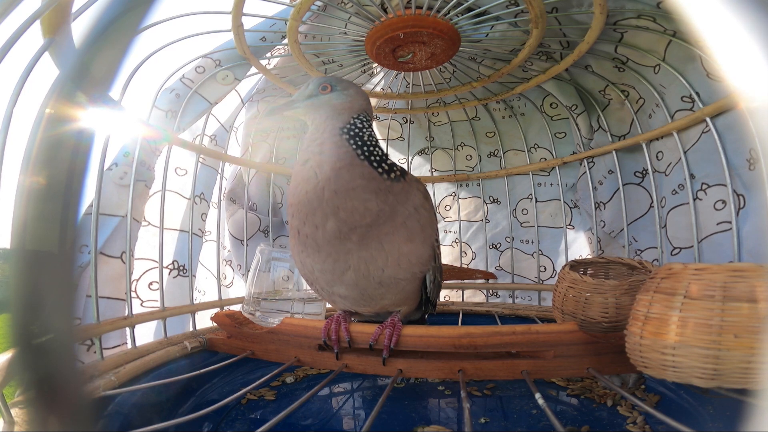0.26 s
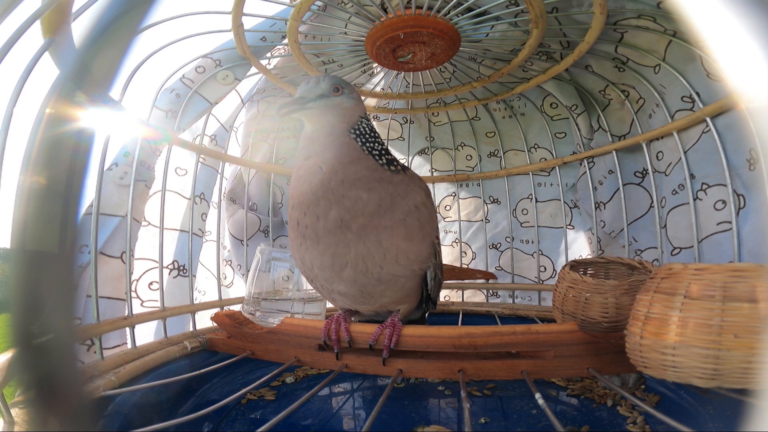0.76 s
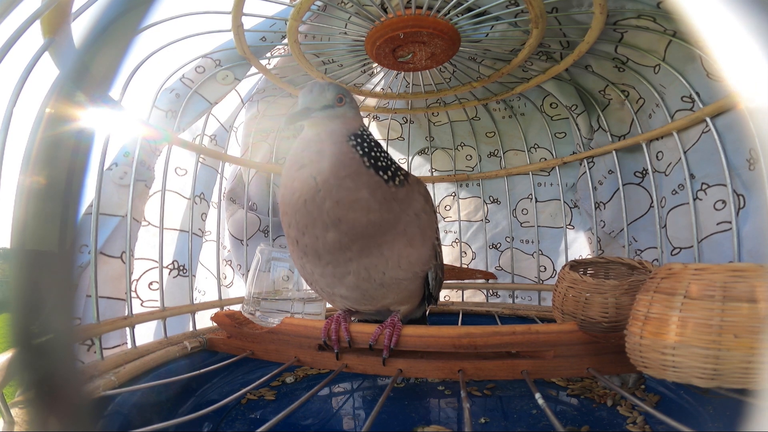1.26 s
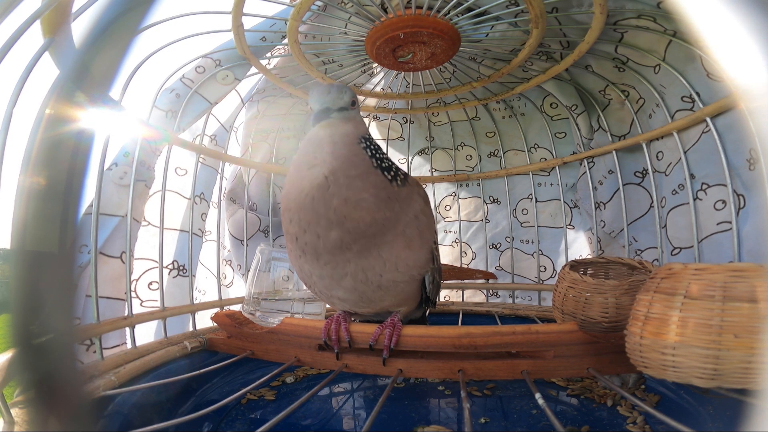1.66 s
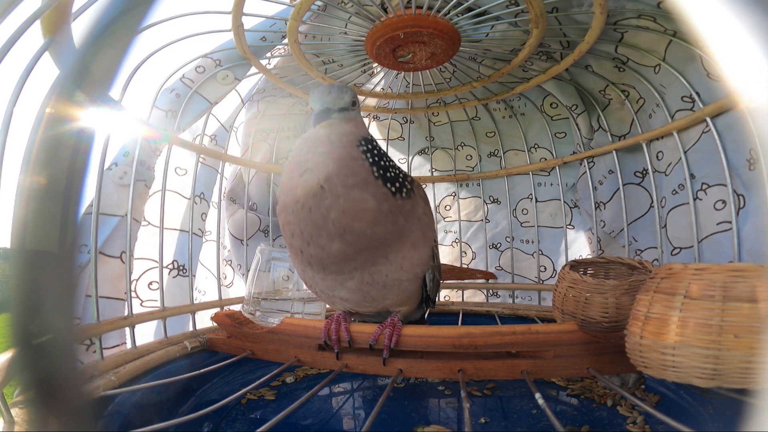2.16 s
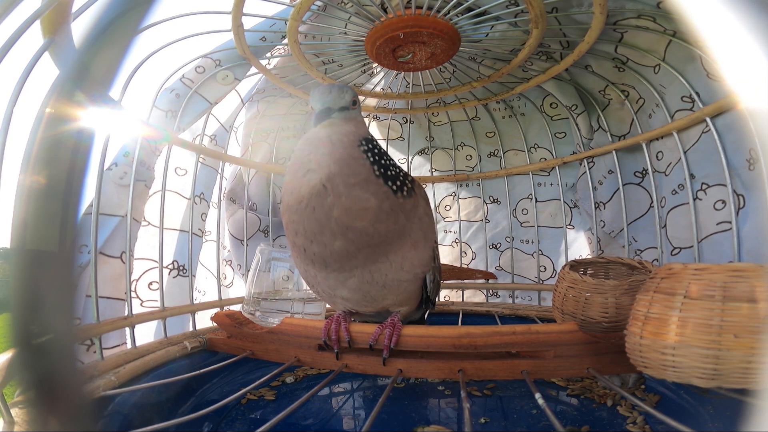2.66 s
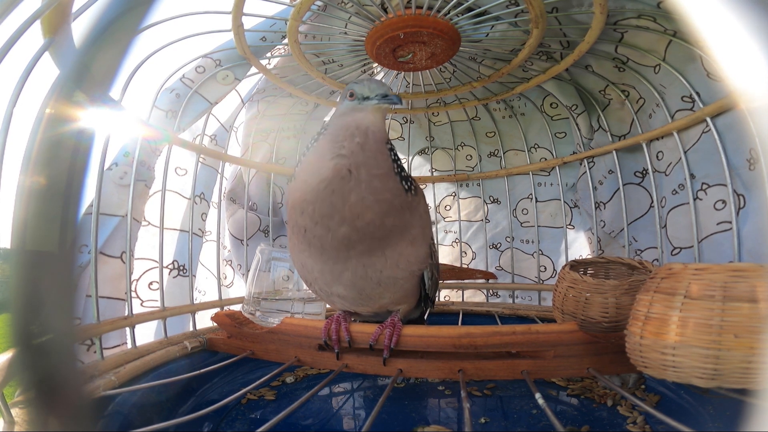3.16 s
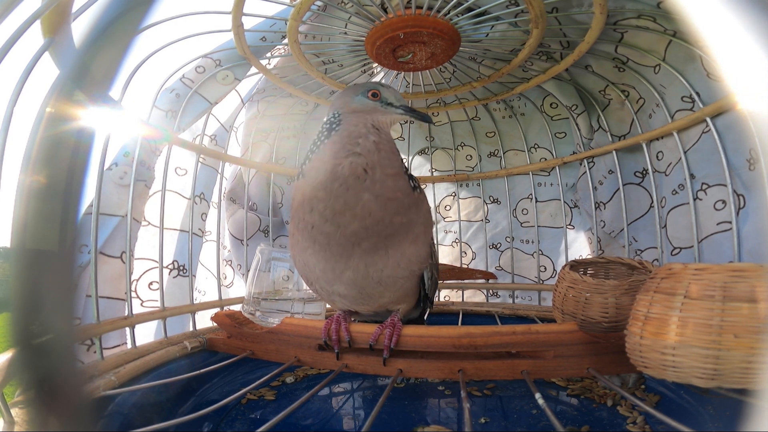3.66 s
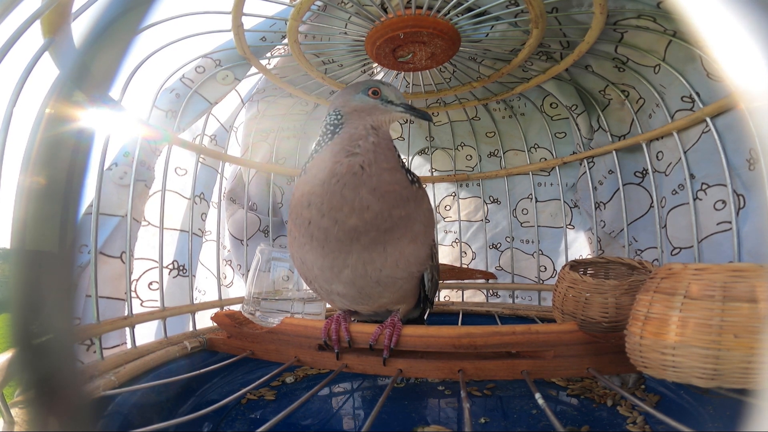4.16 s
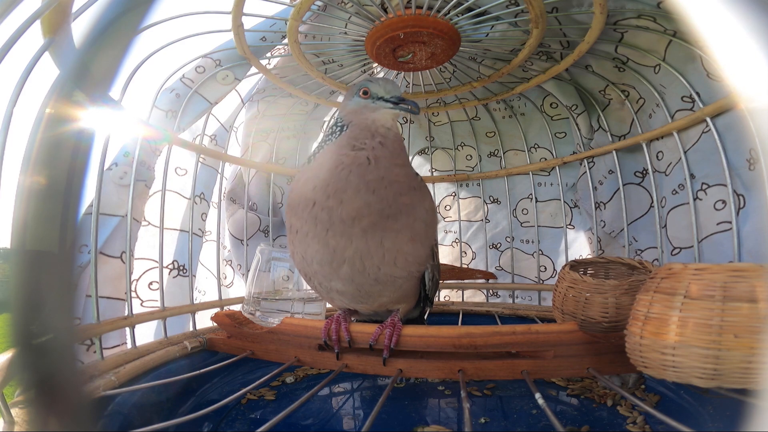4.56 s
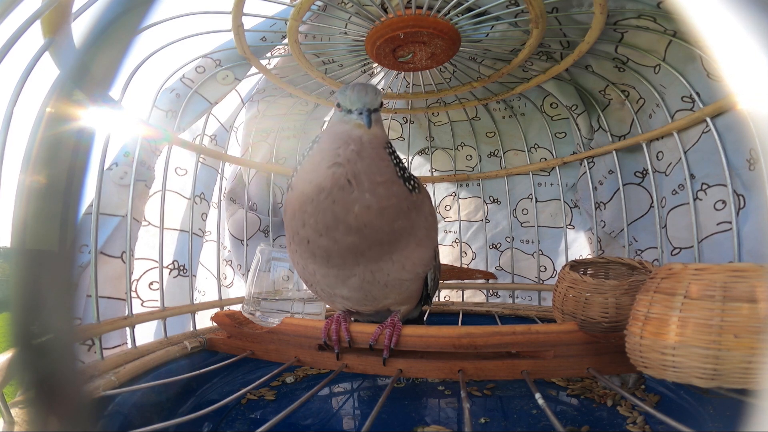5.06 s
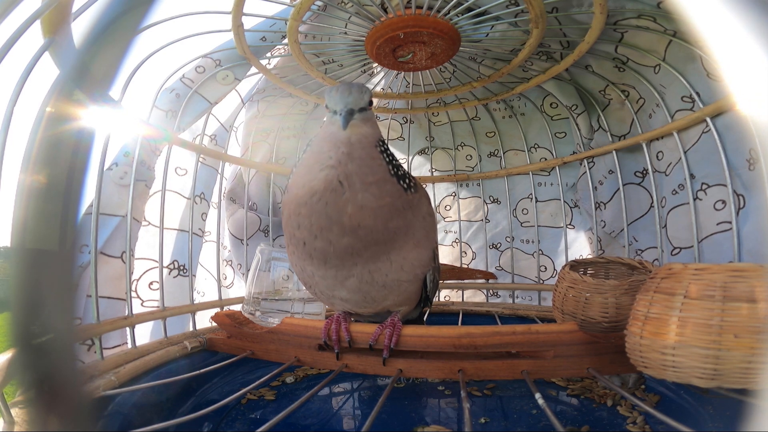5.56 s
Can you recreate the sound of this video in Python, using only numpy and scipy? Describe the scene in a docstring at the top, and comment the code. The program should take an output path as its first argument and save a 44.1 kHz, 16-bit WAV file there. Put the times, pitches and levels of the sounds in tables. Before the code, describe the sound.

A caged dove close by gives two throaty rolling coo phrases, with small birds whistling behind and low traffic rumble and soft hiss.

```python
"""Caged dove, two phrases

A spotted dove sings close by in a covered cage: cluck, arched coo, rolled coo that sinks away and, in the
first phrase, a soft closing coo. Air pressure drives pitch and level of its near-pure tone; loud peaks clip.
Other birds (gliding sines) whistle and chirp farther off, cage ticks and rustles are noise through high modes,
and far traffic and hiss are shaped stereo noise."""
import sys
import numpy as np
from scipy import signal
from scipy.io import wavfile

SR = 44100
rng = np.random.default_rng(int(sys.argv[2]) if len(sys.argv) > 2 else 0)


def persist_wave(psi):
    """Save psi, clipped to +-1, as 16-bit WAV."""
    counts = np.round(np.clip(psi, -1, 1) * 32767).astype(np.int16)
    wavfile.write(sys.argv[1], SR, np.atleast_2d(counts).T)


N = 256662
TIME = np.arange(N) / SR


def from_db(db):
    """Decibels to gain."""
    return 10 ** (np.asarray(db) / 20)


def rms_one(x):
    """Scale to unit RMS."""
    return x / np.sqrt(np.mean(x ** 2) + 1e-20)


def in_time(rows):
    """Each column of a time table, interpolated to every sample."""
    s, *columns = np.transpose(rows)
    return [np.interp(TIME, s, c) for c in columns]


def at_hz(points, hz):
    """Read a spectrum on a log-frequency axis."""
    table_hz, values = np.transpose(points)
    return np.interp(np.log(hz), np.log(table_hz), values)


def band(x, low_hz, high_hz):
    """Butterworth band-pass."""
    edges_hz = [low_hz, min(high_hz, .45 * SR)]
    return signal.sosfilt(signal.butter(2, edges_hz, "band", fs=SR, output="sos"), x + 1e-18)


def resonance(x, hz, width_hz):
    """Two-pole resonance, unit gain at the peak."""
    r = np.exp(-np.pi * width_hz / SR)
    numerator = np.array([1, 0, -1]) * (1 - r * r) / 2
    denominator = [1, -2 * r * np.cos(2 * np.pi * hz / SR), r * r]
    return signal.lfilter(numerator, denominator, x + 1e-18)


def drift(rate_hz):
    """Random wander of unit RMS, with rate_hz new values per second."""
    return rms_one(np.interp(TIME * rate_hz, np.arange(8192), rng.standard_normal(8192)))


def delayed(x, seconds):
    """The same sound arriving later."""
    return np.interp(TIME - seconds, TIME, x, left=0)


def phase_of(hz):
    """Running phase of a gliding pitch."""
    return 2 * np.pi * np.cumsum(hz) / SR


def swell(start, length):
    """Half-sine rise and fall."""
    return np.sin(np.pi * np.clip((TIME - start) / length, 0, 1))


def sounding(start, length, edge_s):
    """Gate with tanh edges."""
    opening = np.tanh((TIME - start) / edge_s / 2)
    closing = np.tanh((TIME - start - length) / edge_s / 2)
    return (opening - closing) / 2


def glide(start, length, from_hz, to_hz, db, waver):
    """Short bird note: a sine sliding between two pitches under a half-sine swell."""
    pitch = np.interp(TIME, [start, start + length], [from_hz, to_hz])
    return from_db(db) * swell(start, length) * np.sin(phase_of(pitch * (1 + waver)))


def reverb(x, t60):
    """Dense decaying reflections, independent per side, unit energy."""
    t = TIME[:SR]
    tail = rng.standard_normal((2, SR)) * from_db(-60 * t / t60) * (1 - np.exp(-t / 0.0034))
    tail /= np.sqrt(np.sum(tail ** 2, axis=1, keepdims=True))
    return signal.fftconvolve(x[None], tail, axes=1)[:, :N]


# left-right correlation of the outdoor noise: [f/Hz, correlation/1]
LIKENESS = [(50, 1), (150, 0.93), (400, 0.27), (1000, 0.49), (2500, .1), (10000, 0.088)]


def banded_noise(spectrum, patchy_db):
    """Half-octave bands of stereo noise, each with its own level, flicker and left-right correlation."""
    out, edges_hz = 0, 20 * 2 ** (np.arange(21) / 2)
    white = rng.standard_normal((2, 2, N))
    for k, (low, high) in enumerate(zip(edges_hz, edges_hz[1:])):
        mid, side = band(white[k % 2], low, high)
        hz = np.sqrt(low * high)
        alike = np.clip(at_hz(LIKENESS, hz), -1, 1)
        gain = from_db(at_hz(spectrum, hz) + patchy_db * drift(14))
        stereo = np.sqrt(1 + alike) * mid + np.sqrt(1 - alike) * side * [[1], [-1]]
        out = out + gain * stereo
    return rms_one(out)


# background level before channel trim; swells, steps down abruptly near 3.93 s, then rises again:
# [t/s, rumble level/dB, hiss level/dB]
BACKGROUND = [(0, -39, -51), (0.6, -36, -48), (1.3, -34.5, -46), (3.05, -31.5, -44.5), (3.925, -33, -44.5),
              (3.95, -41, -52), (4.35, -37.5, -48.5), (5.3, -36.5, -48.3), (5.82, -34.5, -41.5)]
# traffic spectrum: [f/Hz, relative density/dB per Hz]
RUMBLE = [(12, -41), (20, -16), (48, -2.5), (85, 0.5), (129, -5), (195, -5), (282, -13), (344, -15),
          (375, -15), (409, -19.5), (600, -24.5), (780, -59), (1320, -120)]
# hiss spectrum: [f/Hz, relative density/dB per Hz]
HISS = [(300, 3.5), (450, -1), (700, -2), (1000, -5), (1500, -9.5), (2300, -13.5), (3300, -20.5),
        (5500, -23.5), (8000, -36), (10000, -26), (12000, -39), (16000, -51.5)]


def outdoors(left_lag_s=.0005):
    """Far traffic and soft hiss as band noise, reaching the right port first."""
    rumble_db, hiss_db = in_time(BACKGROUND)
    rumble = from_db(rumble_db) * rms_one(band(banded_noise(RUMBLE, patchy_db=2.0), 26, 1200))
    hiss = from_db(hiss_db) * rms_one(band(banded_noise(HISS, patchy_db=1.0), 370, 18000))
    left, right = rumble + hiss
    return np.array([delayed(left, left_lag_s), right]) * from_db([[-.5], [.5]])


# slurs of a distant bird: [t/s, level/dB before mix]
SLURS = [(0.01, -52), (1.535, -51.5), (5.031, -50.5)]


def slurs(length_s=0.066, start_hz=1625, end_hz=2077, quaver=0.036):
    """Rising slurs: upward sine glides with slight pitch jitter."""
    wobble = quaver * drift(500)
    return sum(glide(start, length_s, start_hz, end_hz, db, wobble) for start, db in SLURS)


def twitter(count=6, db=-64, length_s=0.12, quaver=0.032, low_hz=2000, high_hz=3300):
    """Faint quavering notes at random times and log-random pitches."""
    wobble = quaver * drift(500)
    when, height = rng.random((count, 2)).T
    pitches_hz = low_hz * (high_hz / low_hz) ** height
    return sum(glide(start, length_s, hz, hz, db, wobble) for start, hz in zip(when * N / SR, pitches_hz))


# cage ticks: [t/s, level/dB before trim, length/s]
TICKS = [(0.291, -44, 0.013), (0.357, -42, 0.0094), (0.478, -43, 0.0082), (1.1646, -42, 0.0091),
         (1.3138, -32, 0.0091), (2.476, -48, 0.01), (2.708, -44, 0.01), (4.155, -48, 0.01),
         (4.5837, -39.5, 0.0102), (4.6766, -38.5, 0.013), (5.3179, -44.5, 0.01), (5.377, -42, 0.0095)]
# longer rustles: [t/s, length/s, level/dB of the drive]
RUSTLES = [(0.152, 0.11, -48), (1.082, 0.075, -48), (4.561, 0.033, -50.5), (5.213, 0.047, -46)]
# modes rung by ticks and rustles: [f/Hz, width/Hz, level/dB]
TICK_MODES = [(4270, 1100, 0.5), (6300, 790, 1.5), (9200, 990, -3), (12300, 2600, -15.5)]


def ticks_and_rustles(grain_db=4, tick_db=-1.0, lead_s=0.0017):
    """Grainy friction noise, in short and longer swells, rings a few high modes."""
    friction = rms_one(rng.standard_normal(N) * from_db(grain_db * drift(830)))
    tick_force = sum(from_db(db + tick_db) * swell(start - lead_s, length) for start, db, length in TICKS)
    rustle_force = sum(from_db(db) * swell(start, length) for start, length, db in RUSTLES)
    drive = (tick_force + rustle_force) * friction
    # alternate mode signs
    return sum((-1) ** k * from_db(db) * resonance(drive, hz, width)
               for k, (hz, width, db) in enumerate(TICK_MODES))


# two-stroke tweets: [t/s, level/dB before stroke level and mix]
TWEETS = [(0.187, -39.5), (5.207, -40)]
# strokes of a tweet: [delay/s, length/s, start f/Hz, end f/Hz, relative level/dB]
STROKES = [(0, 0.025, 3300, 3950, -8.5), (0.025, 0.039, 3080, 3575, 0)]


def tweets(warble=0.012):
    """Quick tweets: two rising sine strokes each, with pitch jitter."""
    wobble = warble * drift(500)
    return sum(glide(start + delay, length, from_hz, to_hz, db + stroke_db, wobble)
               for start, db in TWEETS for delay, length, from_hz, to_hz, stroke_db in STROKES)


# distant cheeps: [t/s, length/s, f/Hz, level/dB before mix, quaver/share of f]
CHEEPS = [(0.429, 0.024, 2740, -55.5, 0.052), (0.533, 0.073, 2606, -55.5, 0.036),
          (0.709, 0.028, 2610, -49, 0.09), (1.586, 0.04, 2290, -55, 0.069), (2.623, 0.11, 5480, -61, 0.04),
          (2.704, 0.024, 2570, -43, 0.05), (2.739, 0.02, 2587, -43.5, 0.04),
          (3.165, 0.034, 2430, -47.5, 0.06), (3.504, 0.1, 3500, -55.5, 0.0053),
          (3.545, 0.037, 2490, -45.5, 0.097), (3.58, 0.02, 2690, -44.5, 0.1),
          (3.616, 0.23, 5440, -65.5, 0.044), (3.721, 0.03, 2250, -53, 0.0046),
          (3.88, 0.05, 2955, -56.5, 0.006)]


def cheeps():
    """Distant cheeps: level-pitched sines that quaver at random."""
    wobble = drift(500)
    return sum(glide(start, length, hz, hz, db, quaver * wobble) for start, length, hz, db, quaver in CHEEPS)


def dove(jitter=0.0049, shimmer_db=0.25, octave_db=-31, upper_db=-52, husk_db=-3, throat_hz=670, flutter=0.13,
         ring_db=-17, ring_hz=660, ring_width_hz=60):
    """Beak shut, the swollen throat lets out an almost pure tone, a faint octave and husky edges."""
    pitch, strength, husk = airflow()
    phase = phase_of(pitch * (1 + jitter * drift(150)))
    tone = strength * from_db(shimmer_db * drift(120)) * np.sin(phase)
    # octave: nearly as strong in soft notes as in loud; passes best at low pitch
    octave = np.tanh(strength / 0.12) * np.sin(2 * phase)
    octave = from_db(octave_db) * band(band(octave, 540, 960), 540, 960)
    # fourth and fifth harmonics: emerge near full pressure
    upper = from_db(upper_db) * strength ** 2 * sum(np.sin(k * phase) for k in (4, 5))
    # unsteady flutter around the throat resonance, before the tone locks in and after it breaks off
    unsteady = np.sin(phase_of(throat_hz * (1 + flutter * drift(450))))
    rasp = from_db(husk_db) * band(husk * unsteady, 470, 880)
    voice = tone + octave + upper + rasp
    # sudden starts and stops leave the cage ringing
    cage_ring = from_db(ring_db) * resonance(delayed(voice, .006), ring_hz, ring_width_hz)
    return voice, cage_ring


def airflow():
    """Strength-weighted pitch, total strength and total huskiness over all dove notes."""
    parts = short_beats() + arched_coos() + rolled_coos() + [closing_coo()]
    strength = sum(level for _, level, _ in parts)
    pitch = sum(hz * level for hz, level, _ in parts) / (strength + 1e-9)
    return pitch, strength, sum(husk for _, _, husk in parts)


def loudness(hz, full_db=2.5, full_hz=553.7, knee_hz=15.85, db_per_hz=0.1567):
    """Pressure raises pitch and level together, until level saturates at full pressure."""
    shortfall_hz = knee_hz * np.logaddexp(0, (full_hz - hz) / knee_hz)
    return from_db(full_db - db_per_hz * shortfall_hz)


def melody(shape, start, stretch):
    """Note pitch at every sample, and note end time."""
    s, hz = np.transpose(shape)
    return np.interp(TIME, start + stretch * s, hz), start + stretch * s[-1]


def beat(start, length, hz, db, edge_s=0.0013, sag=.065, puff=0.13, puff_s=0.012, lead=.12, lead_s=0.0038):
    """One short opening (pitch, strength, husk): pitch arches, air leaks before and flutters after."""
    place = np.clip(2 * (TIME - start) / length - 1, -1.5, 1.5)
    after = TIME - start - length
    peak = from_db(db) * loudness(hz)
    leak = lead * swell(start - 2 * lead_s, 2 * lead_s)
    release = puff * (after > 0) * np.exp(-np.abs(after) / puff_s)
    arched_hz = hz * (1 + sag * (1 / 4 - place ** 2))
    return arched_hz, peak * sounding(start, length, edge_s), peak * (leak + release)


# short single beats, two clucks and a brief stumble early in the first rolled coo:
# [t/s, length/s, nominal f/Hz, accent level/dB]
SHORT_BEATS = [(1.018, 0.0225, 509.2, -0.7), (1.7724, 0.0049, 560, -2.5), (4.7712, 0.0245, 506, 1.0)]


def short_beats():
    """Two clucks and a brief stumble early in the first roll: throat openings with a stronger, longer release."""
    return [beat(*row, puff=0.24, puff_s=0.021) for row in SHORT_BEATS]


# arched-coo melody: [t/s into note before stretch, f/Hz]
ARCH = [(0, 420), (0.009, 491.8), (0.023, 539.2), (0.05, 556), (0.087, 612.6), (0.143, 605.2), (0.172, 543),
        (0.216, 508), (0.236, 385)]
# arched coos: [t/s, length/s, time stretch/1, accent level/dB, break delay/s, break step/dB,
# husk t/s, husk length/s]
ARCHED_COOS = [(1.334, 0.229, 0.985, -0.39, 0.1, -2.7, 1.308, 0.05),
               (5.076, 0.224, 1.01, -0.23, 0.093, -2, 5.066, 0.032)]


def arched_coos(edge_s=0.0016, husk_db=-18):
    """Husky start, then a clear pitch arch whose level drops a step where the voice breaks near the top."""
    parts = []
    for start, length, stretch, db, break_s, break_db, husk_start, husk_s in ARCHED_COOS:
        pitch, _ = melody(ARCH, start, stretch)
        broken = sounding(start + break_s, length, edge_s / 2)
        level = from_db(db + break_db * broken)
        strength = level * loudness(pitch) * sounding(start, length, edge_s)
        parts.append((pitch, strength, from_db(husk_db) * swell(husk_start, husk_s)))
    return parts


# rolled-coo melody: [t/s into note before stretch, f/Hz]
ROLL = [(0, 537.6), (0.05, 572), (0.14, 562), (0.25, 537), (0.315, 512), (0.41, 466), (0.512, 415),
        (0.545, 285)]
# rolled coos: [t/s, time stretch/1, accent level/dB, tiring/dB per s (negative: strengthens),
# first quick beat centre t/s, first gap/s, shortening per gap/s]
ROLLED_COOS = [(1.7434, 1.0, 1.4, 6.0, 1.7995, 0.0325, 0.00164),
               (5.4704, 1.14, 1.47, -2.3, 5.516, 0.0303, 0.00084)]


def rolled_coos():
    """All rolled coos, as a flat list of beats and merged tones."""
    return [part for row in ROLLED_COOS for part in rolled_coo(*row)]


def rolled_coo(start, stretch, db, tiring_db, first_beat, gap, shortening, count=11, opening_db=-0.9,
               tail_db=0.74, edge_s=0.0012, uneven_length=0.055, uneven_pitch=0.0053,
               opening_s=0.023, beat_s=0.0105, widening=0.219):
    """Long opening beat, then ever quicker, uneven beats that merge into one sinking tone."""
    pitch, end = melody(ROLL, start, stretch)
    opening_hz = np.interp(start + opening_s / 2, TIME, pitch)
    parts, centre = [beat(start, opening_s, opening_hz, db + opening_db)], first_beat
    for k, (longer, higher) in enumerate(rng.standard_normal((count, 2))):
        # beats lengthen by a share (widening) of the time the gaps lose
        length = (beat_s + widening * shortening * k) * (1 + uneven_length * longer)
        hz = np.interp(centre, TIME, pitch) * (1 + uneven_pitch * higher)
        parts.append(beat(centre - length / 2, length, hz, db - tiring_db * (centre - start)))
        centre = centre + gap - shortening * k
    merged = centre - beat_s / 2
    strength = from_db(tail_db) * loudness(pitch) * sounding(merged, end - merged, edge_s)
    return parts + [(pitch, strength, 0)]


# rising whistles: [t/s, length/s, attack/s, settling f/Hz, top f/Hz of the closing flick, rise constant/s,
# flick constant/s, level/dB before mix]
WHISTLES = [(2.069, 0.152, 0.053, 3915, 6040, 0.033, 0.019, -34),
            (4.736, 0.157, 0.072, 4494, 5170, 0.072, 0.01, -34.5)]


def whistles(start_hz=3050, fade_db_per_s=35, warble=0.012, flick_warble=0.055, grain_db=2, edge_s=0.0012,
             strand_db=-17, strand_ratio=0.87):
    """Warbling whistles with a faint lower strand: rise, level off, break into a rough flick."""
    out, wobble = 0, drift(500)
    for start, length, attack_s, settle_hz, top_hz, rise_s, flick_s, db in WHISTLES:
        t = np.clip(TIME - start, 0, length)
        flick = np.exp((t - length) / flick_s)
        rise_hz = (start_hz - settle_hz) * np.exp(-t / rise_s)
        pitch = settle_hz + rise_hz + (top_hz - settle_hz) * flick
        level = from_db(db - fade_db_per_s * np.abs(t - attack_s)) * np.minimum(t / attack_s, 1)
        phase = phase_of(pitch * (1 + (warble + flick_warble * flick) * wobble))
        strands = np.sin(phase) + from_db(strand_db) * np.sin(strand_ratio * phase)
        out = out + level * sounding(start, length, edge_s) * strands
    return out * from_db(grain_db * drift(300))


# soft closing coo: [t/s, f/Hz]
CLOSING_COO = [(2.536, 414.6), (2.562, 477), (2.58, 512.4), (2.61, 515.5), (2.668, 499), (2.70, 476),
               (2.737, 424.6), (2.775, 270.8)]


def closing_coo(db=0.9, edge_s=0.001, catch_at_s=0.013, catch_s=0.0068, catch_db=-10, husk_db=-22, husk_s=0.036):
    """Low pitch arch that starts husky and catches once before the tone is steady."""
    pitch, = in_time(CLOSING_COO)
    start, end = CLOSING_COO[0][0], CLOSING_COO[-1][0]
    level = from_db(db + catch_db * swell(start + catch_at_s, catch_s))
    strength = level * loudness(pitch) * sounding(start, end - start, edge_s)
    return pitch, strength, from_db(husk_db) * sounding(start, husk_s, edge_s)


def scene(right_db=-4.5, right_lag_s=0.00025, room_db=-35):
    """Dove nearer the left port; other birds come with the echo of the yard."""
    voice, cage_ring = dove()
    near = voice + cage_ring
    song = np.array([near, from_db(right_db) * delayed(near, right_lag_s)])
    song = song + from_db(room_db) * reverb(voice, t60=0.75)
    whistle = tweets() + whistles()
    chirp = slurs() + twitter() + cheeps()
    cage_noise = ticks_and_rustles()
    # high ends of the whistles echo most
    birds = whistle * from_db([[3], [-8]]) + reverb(band(whistle, 4100, 9000), t60=0.36)
    birds = birds + from_db(-2.5) * chirp + from_db(8) * reverb(chirp, t60=0.27)
    cage = cage_noise + from_db(-3.0) * reverb(cage_noise, t60=.15)
    return song + birds + cage + outdoors()


def record(dry, stopband_hz=17000):
    """Recorder clips at full scale, then a steep low-pass cuts the top."""
    clipped = np.clip(dry, -1, 1)
    return signal.sosfilt(signal.cheby2(12, 70, stopband_hz, fs=SR, output="sos"), clipped)


dry = scene()
out = record(dry)
persist_wave(out)
```